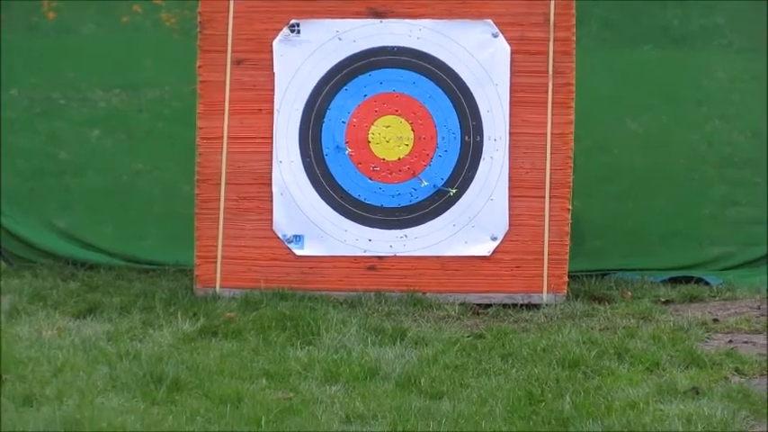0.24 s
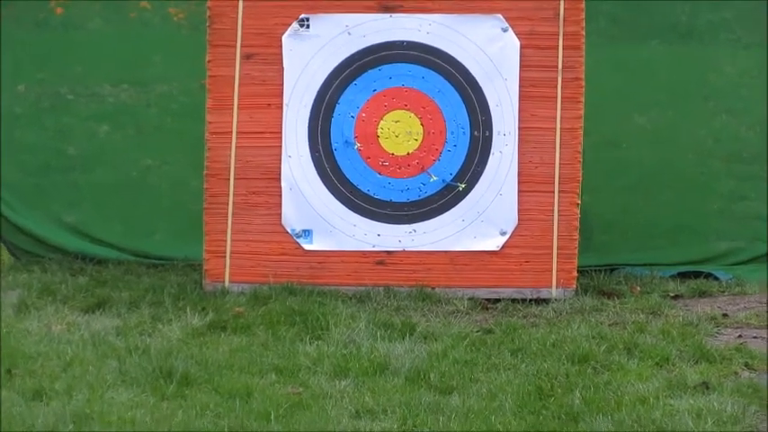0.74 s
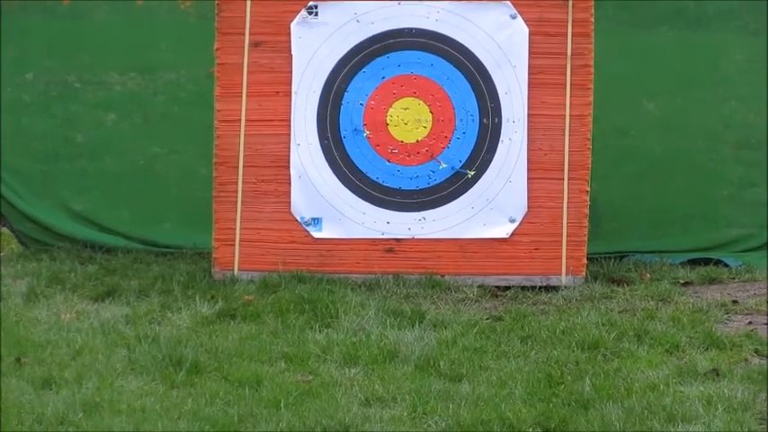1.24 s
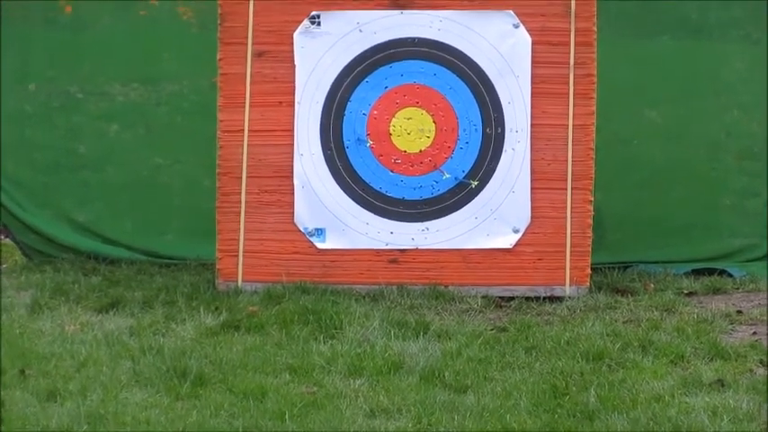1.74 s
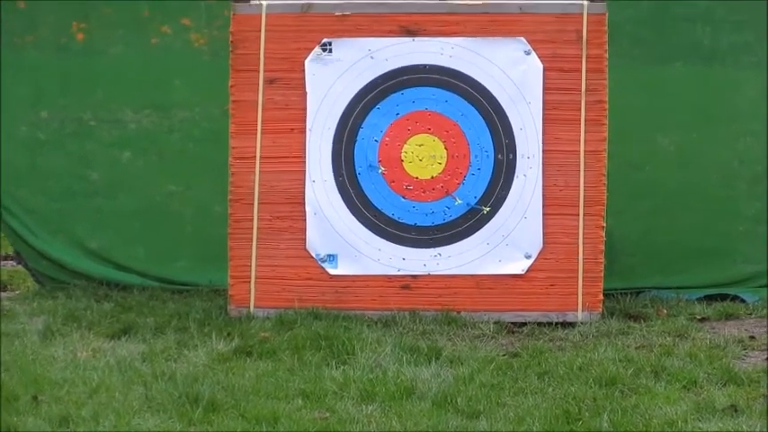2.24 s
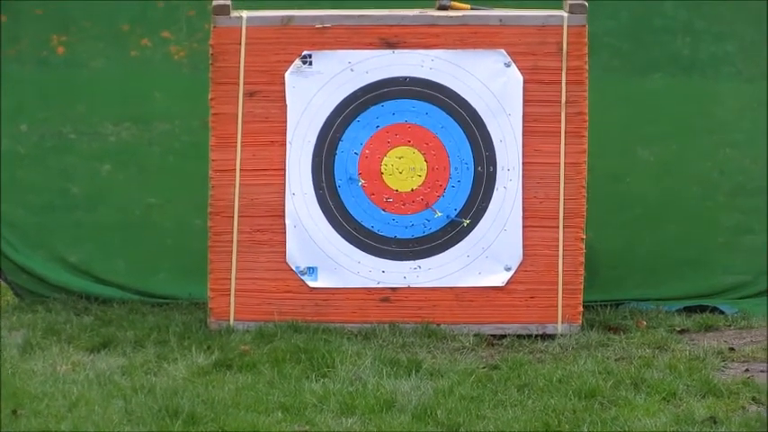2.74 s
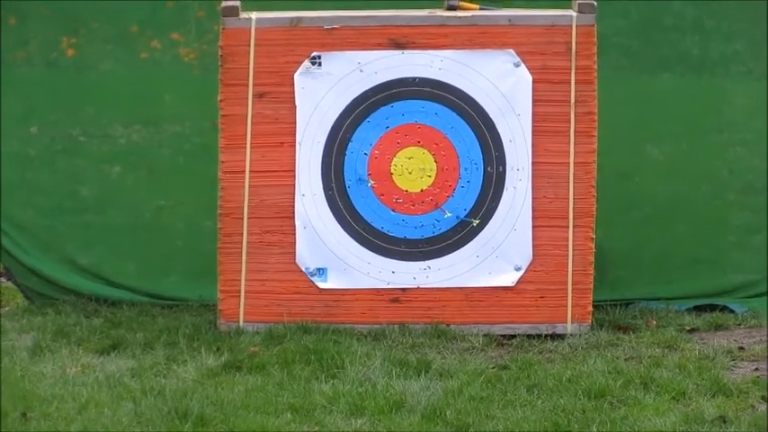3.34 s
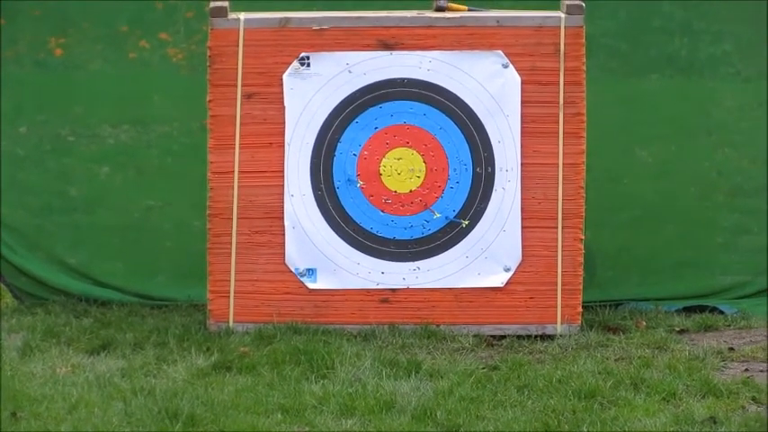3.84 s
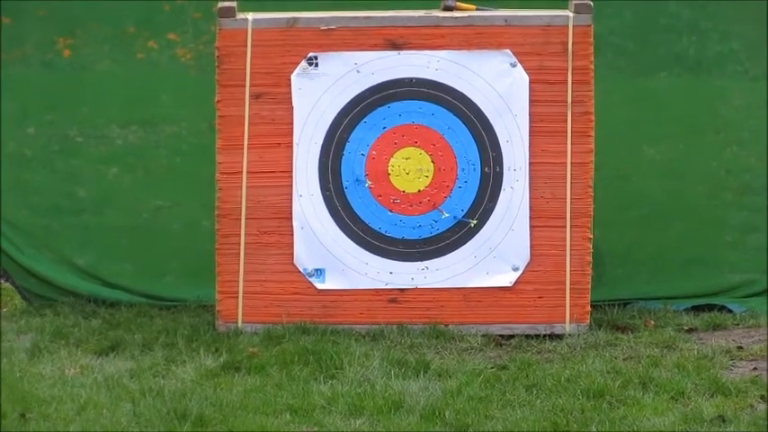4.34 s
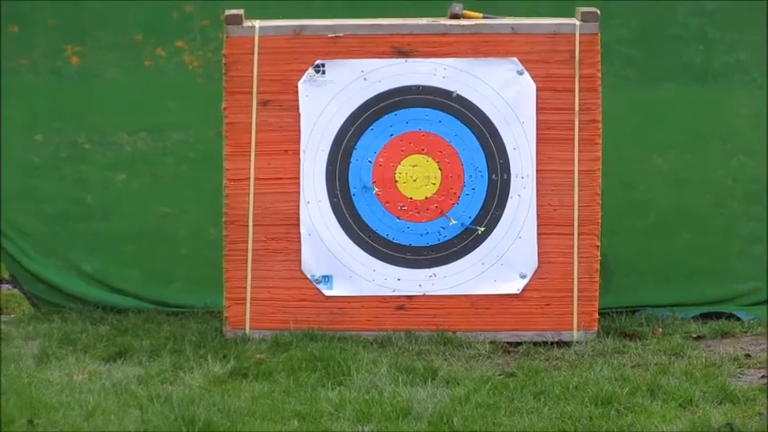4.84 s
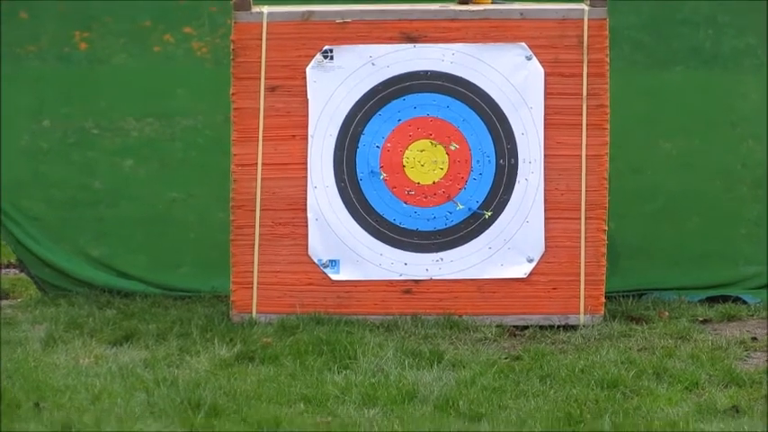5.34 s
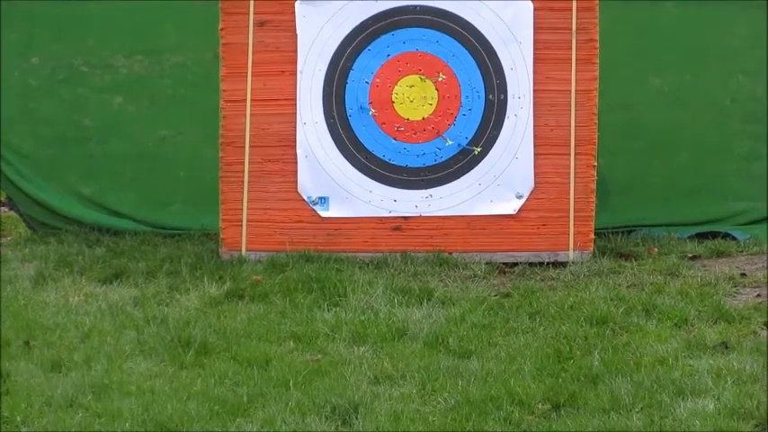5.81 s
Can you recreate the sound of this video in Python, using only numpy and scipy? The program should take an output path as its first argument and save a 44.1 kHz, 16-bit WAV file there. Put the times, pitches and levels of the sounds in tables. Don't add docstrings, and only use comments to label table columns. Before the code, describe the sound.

A calm open-air archery range heard from beside the archer. Faint traffic rumble, leaves in light wind and occasional high bird chirps come first. Late on, the bow releases close and dry, the string snapping and chattering while loose metal rattles. After a short gap the arrow hits the distant boss with a hard crack and low shove. The ambience dips after each blow, then recovers with small rustles and a gust.

```python
import sys
import numpy as np
from scipy import signal
from scipy.fft import rfft, irfft
from scipy.io import wavfile
from scipy.ndimage import uniform_filter1d

SR = 44100
rng = np.random.default_rng(int(sys.argv[2]) if len(sys.argv) > 2 else 0)


def output_pcm(signal):
    pcm = np.clip(np.atleast_2d(signal).T, -1, 1) * 32767
    wavfile.write(sys.argv[1], SR, np.round(pcm).astype(np.int16))


def how_loud(loudness_db):
    steps = np.asarray(loudness_db, float) / 20
    return 10 ** steps


N = 267907
T = np.arange(N) / SR

# (frequency [Hz], density [dB per Hz])
AIR_COLOUR = [(14, -30), (24, -10), (54, -2), (130, -4.5), (185, 0), (263, -4.5), (300, -3), (330, -7),
              (370, -7), (800, -10), (1600, -13), (1950, -17.5), (8380, -28), (15000, -39)]
# (time [s], level [dB])
BREEZE = [
    (0, -0.5),
    (.5, 0),
    (4.5, 0.5),
    (5.3, -1),
    (5.65, .5),
    (5.85, 0),
    (5.97, 4),
    (6.07, 1.5),
]
# (time [s], peak [dB], centre [Hz], width [Hz], t60 [s])
RUSTLES = [(.0021, -45.5, 2500, 1700, 0.5), (.003, -50, 3350, 300, 0.56), (.0022, -49.5, 8900, 4100, 0.36),
           (.1882, -28.5, 1450, 1500, 0.014), (.19, -41, 2500, 2500, 0.043),
           (2.438, -40.5, 2600, 7500, 0.062), (4.19, -48.5, 3140, 340, 1.9),
           (5.3362, -26, 2970, 1000, 0.011), (5.338, -48, 2600, 1400, 0.087), (5.459, -45, 540, 610, .025),
           (5.7, -44.5, 2400, 3800, 0.63), (5.76, -47, 7500, 5100, 0.35), (5.92, -42, 590, 1000, 0.4)]
# (time [s], level [dB], sign, frequency [Hz], t60 [s])
THUMPS = [
    (.187, -39.5, -1, 110, 0.083),
    (5.093, -33, 1, 103, 0.033),
    (5.0981, -18, -1, 164, 0.028),
    (5.1025, -38, 1, 75.4, .45),
    (5.119, -29, -1, 185, 0.034),
    (5.165, -32.5, -1, 129, 0.12),
    (5.1795, -33, 1, 190, 0.092),
]
# (time [s], length [s], from [Hz], to [Hz], level [dB])
BIRD_NOTES = [(.69, .027, 4550, 6500, -60), (.7, .07, 2700, 4370, -52), (1.49, .2, 4800, 4700, -72),
              (3.43, .08, 5950, 5820, -73), (4.05, .024, 4500, 4850, -65), (4.072, .046, 5400, 5650, -64),
              (4.168, .037, 4300, 3550, -64), (4.212, .043, 4400, 3400, -63),
              (4.395, .105, 4020, 3960, -66), (4.505, .032, 4400, 6400, -65), (4.51, .032, 2400, 3950, -62),
              (4.538, .062, 4170, 4250, -49)]
# (frequency [Hz], level [dB], t60 [s])
FIELD = [(200, -36, 0.34), (500, -26, 0.39), (1200, -39.5, 0.59), (2600, -39.5, 0.78), (3580, -57, 0.33),
         (5600, -39.5, 0.41), (12000, -54, .2)]
# (time [s], peak [dB], centre [Hz], t60 [s])
SNAPS = [(4.592, -28, 547, 0.21), (4.5926, -29, 1800, 0.082), (4.599, -24.5, 5960, 0.049),
         (4.6123, -19.5, 2220, 0.052), (4.6126, -27.5, 550, 0.091), (4.619, -11, 7900, 0.0038),
         (4.6213, -8, 9700, 0.0079), (4.6207, -19.5, 1740, 0.033), (4.6245, -16.5, 4940, 0.058),
         (4.63, -28, 10500, 0.065), (4.635, -34, 1300, 0.37), (4.64, -36.5, 6950, 0.43)]
# (time [s], level [dB], strongest pitch [Hz], spread [Hz])
CLINKS = [
    (4.5979, -28, 3300, 400),
    (4.5992, -23.5, 3300, 400),
    (4.6193, -22.5, 7200, 2500),
    (4.6395, -19.5, 2900, 300),
    (4.651, -35, 7550, 900),
    (4.654, -33.5, 1150, 500),
    (4.664, -32, 3450, 700),
    (4.675, -37, 6200, 1500),
    (4.686, -37, 5000, 1200),
    (4.708, -33, 3900, 1200),
]
# (frequency [Hz], level [dB], t60 [s])
FITTINGS = [(1156, 1, 0.073), (1580, 0, 0.12), (2470, -13, 0.12), (2960, -8, 0.14), (3300, 0, 0.033),
            (3500, -4, .06), (3900, -3.5, 0.044), (4450, -1, 0.031), (5080, 3, 0.034), (5800, -3, .05),
            (6670, 6, 0.029), (7430, 1, 0.074), (8500, -6, .05), (11100, 3, 0.065)]
# (time [s], level [dB], sign, frequency [Hz], t60 [s])
LIMBS = [
    (4.6115, -26.5, 1, 380, 0.031),
    (4.6125, -34.5, 1, 115, 0.098),
    (4.6141, -20, 1, 383, 0.024),
]
# (frequency [Hz], level [dB], t60 [s])
FACE = [(465, -20, 0.029), (1170, -20, 0.02), (1700, -14, 0.011), (2300, -23, 0.0065), (2950, -13, 0.0053),
        (3400, -4.5, 0.0045), (3900, -6.5, 0.004), (4230, -20, 0.0023), (5620, -2, 0.0019),
        (7399, -14.5, .0032), (9400, -12.5, 0.0043), (11200, -16, 0.0033)]
# (time [s], level [dB], sign, push [s])
SMACKS = [
    (5.0867, -6.5, -1, .00004),
    (5.08715, -5.5, 1, .00004),
    (5.08772, -12, 1, .00008),
    (5.0887, -10, 1, .0002),
    (5.0911, -13, 1, .0004),
]
# (time [s], edge [Hz])
THINNED = [(.853, 4200), (1.517, 4500), (1.99, 8000), (2.048, 3000), (2.838, 2500), (3.137, 2500),
           (3.412, 3500), (4.309, 3500), (4.715, 7000), (5.482, 4000), (5.717, 4500), (5.785, 5000),
           (5.825, 4000), (5.963, 4500), (6.008, 4000)]
# (time [s], edge [Hz])
DROPPED = [
    (5.123, 6900),
    (5.131, 6900),
    (5.139, 6500),
    (5.963, 8800),
    (5.975, 8800),
    (5.986, 6050),
    (5.996, 9200),
    (6.006, 9400),
]


def band(x, hz, width_hz):
    return signal.lfilter(*signal.iirpeak(min(hz, 0.45 * SR), hz / width_hz, SR), x)


def unit(x):
    return x / np.sqrt(np.mean(x ** 2))


def add(out, s, x):
    i = int(s * SR)
    out[i:i + len(x)] += x[:N - i]


def ring(s, hz, t60):
    t = np.maximum(T[:SR // 2] - s * SR % 1 / SR, 0)
    return np.sin(2 * np.pi * hz * t) * how_loud(-60 * t / t60)


def walk(rate):
    k = int(SR / rate)
    held = np.repeat(rng.standard_normal(N // k + 1), k)
    return uniform_filter1d(uniform_filter1d(held, k), k)[:N]


def air():
    breeze_db = np.interp(T, *np.transpose(BREEZE))
    hz = np.maximum(np.fft.rfftfreq(N, 1 / SR), 1)
    colour_hz, colour_db = np.transpose(AIR_COLOUR)
    colour = how_loud(np.interp(np.log(hz), np.log(colour_hz), colour_db))
    low_share = 1 / (1 + (hz / 1500) ** 2)
    traffic = irfft(rfft(rng.standard_normal(N)) * colour * np.sqrt(low_share), N)
    leaves = irfft(rfft(rng.standard_normal(N)) * colour * np.sqrt(1 - low_share), N)
    scale = how_loud(-49) / np.sqrt(np.mean((traffic + leaves) ** 2))
    traffic = traffic * how_loud(0.8 * walk(6))
    traffic = traffic * how_loud(0.2 * breeze_db)
    return scale * (traffic + leaves * how_loud(breeze_db + 0.49 * walk(14)))


def bursts(table, rise):
    out, t = np.zeros(N), T[:SR // 2]
    for s, db, hz, width_hz, t60 in table:
        noise = band(rng.standard_normal(len(t)), hz, width_hz)
        noise = unit(band(noise, hz, width_hz))
        onset = 1 - np.exp(-t / (rise * t60))
        add(out, s, how_loud(db - 60 * t / t60) * onset * noise / 2)
    return out


def swings(table):
    out = np.zeros(N)
    for s, db, sign, hz, t60 in table:
        push = np.hanning(int(0.43 / hz * SR) + 3)
        add(out, s, np.sign(sign) * how_loud(db) * np.convolve(ring(s, hz, t60), push / push.sum()))
    return out


def birds():
    glide_s, glide_bend, swell_db_per_octave = 0.045, 1.7, 5
    out = np.zeros(N)
    tremble = how_loud(3.5 * walk(150))
    waver = 1 + 0.008 * walk(300)
    for s, length, from_hz, to_hz, db in BIRD_NOTES:
        left = np.clip(1 - (T - s) / glide_s, 0, 1) ** glide_bend
        left_at_end = np.clip(1 - length / glide_s, 0, 1) ** glide_bend
        hz = to_hz + (from_hz - to_hz) * (left - left_at_end) / (1 - left_at_end)
        octaves_below = np.maximum(np.log2(to_hz / hz), 0)
        away_db = -swell_db_per_octave * octaves_below * (length > glide_s)
        gate = np.clip(np.minimum(T - s, s + length - T) / (0.15 * length), 0, 1)
        out += gate * how_loud(db + away_db + 7) * np.sin(2 * np.pi * np.cumsum(hz * waver) / SR)
    return out * tremble


def field(x, gap_s, grain_db):
    t = T[:SR]
    patches = how_loud(grain_db * walk(60.0)[:SR])
    tail = np.zeros(SR)
    for hz, db, t60 in FIELD:
        octave = unit(band(rng.standard_normal(SR), hz, hz / 2.1))
        tail += how_loud(db - 60 * t / t60) * octave
    return signal.fftconvolve(x, tail * patches * np.clip(t / gap_s, 0, 1))[:N]


def bow():
    chatter = [(4.6257 + k * 0.0017, -17 - 2 * k, 4380, 1300) for k in range(4)]
    blows = [*CLINKS, *chatter]
    clinks = np.zeros(N)
    chances = rng.standard_normal((len(blows), len(FITTINGS), 2))
    for (s, db, peak_hz, spread_hz), blow_chances in zip(blows, chances):
        for (hz, mode_db, t60), (sign, detune) in zip(FITTINGS, blow_chances):
            near = 1 / (1 + ((hz - peak_hz) / spread_hz) ** 2)
            level = how_loud(db + mode_db - 7.5) * near * np.sign(sign)
            add(clinks, s, level * ring(s, hz * (1 + 0.0108 * detune), t60))
    scrape_table = [(s, db, hz, min(1.76 * hz, 7000), t60) for s, db, hz, t60 in SNAPS]
    scrapes = bursts(scrape_table, rise=0.026)
    return scrapes + clinks * how_loud(1.8 * walk(500))


def boss(contacts):
    out = np.zeros(N)
    for s, db, sign, push_s in contacts:
        face = sum(how_loud(mode_db) * ring(s, hz, t60) for hz, mode_db, t60 in FACE)
        push = np.exp(-T[:64] / (push_s / 2))
        add(out, s, np.sign(sign) * how_loud(db) * np.convolve(face, push / push.sum()))
    return signal.lfilter(*signal.butter(1, [1000, 13000], "band", fs=SR), out)


def scene():
    near = bow()
    song = how_loud(-2.0) * birds()
    echoes = how_loud(-11) * field(boss(SMACKS[:1]), 0.01, 1.85)
    echoes += how_loud(-16) * field(band(near, 4000, 6000), 0.009803, 4.3)
    echoes += how_loud(-7.5) * field(song, 0.012, 2.6)
    bodies = swings(LIMBS) + swings(THUMPS)
    around = bursts(RUSTLES, rise=0.028) + air()
    return (near + boss(SMACKS) + bodies + song + echoes + around)[None]


def thin_treble(x, size=2048):
    out, hz = x.copy(), np.fft.rfftfreq(size, 1 / SR)
    window = np.hanning(size)
    moments = [(s, edge_hz, 0.4) for s, edge_hz in THINNED]
    moments += [(s, edge_hz, 1e-4) for s, edge_hz in DROPPED]
    for s, edge_hz, kept in moments:
        part = slice(int(s * SR) - size // 2, int(s * SR) + size // 2)
        power = np.abs(rfft(out[part] * window)) ** 2
        threshold = (hz - edge_hz) / 8000 - np.log(kept)
        weak = power < threshold * uniform_filter1d(power, size=40)
        lines = rfft(out[part] * np.sqrt(window))
        out[part] -= np.sqrt(window) * irfft(lines * weak * (hz > edge_hz), size)
    return out


def roll_off(x):
    return signal.sosfilt(signal.butter(12, 16300, fs=SR, output="sos"), x)


def record(dry):
    keep = np.exp(-1 / (0.3 * SR))
    loudness = signal.lfilter([1 - keep], [1, -keep], dry[0] ** 2)
    late = np.roll(loudness, int(0.01 * SR))
    gain = (1 + late / how_loud(-65.5)) ** -0.12
    top_filter = signal.ellip(10, 0.2, 70, 15050, fs=SR, output="sos")
    mix = thin_treble(signal.sosfilt(top_filter, dry[0] * gain))
    return roll_off(mix[None])


dry = scene()
out = record(dry)
output_pcm(out)
```